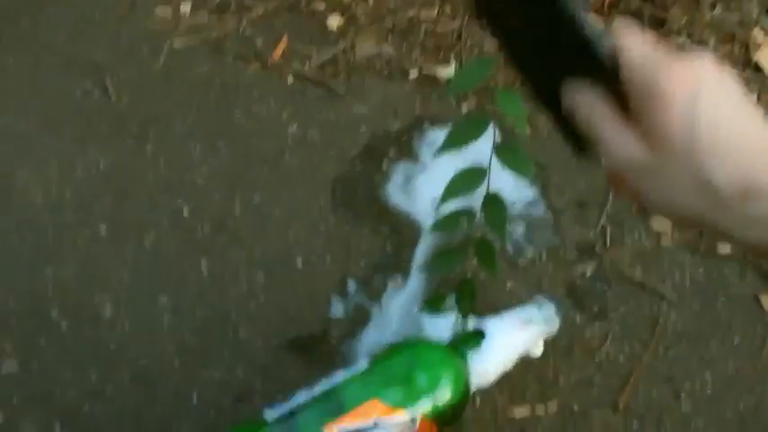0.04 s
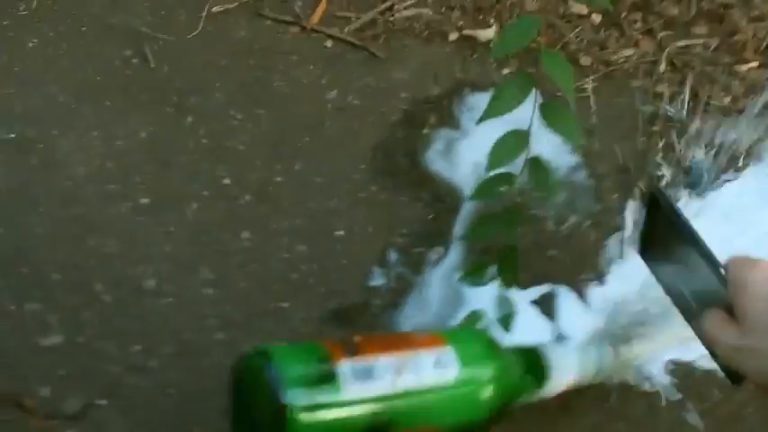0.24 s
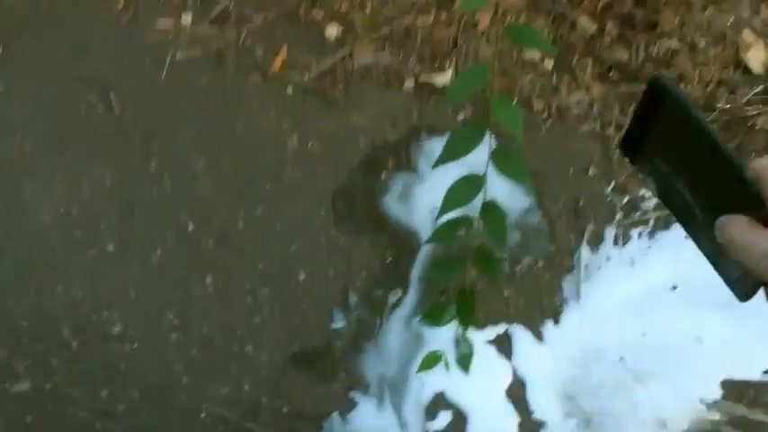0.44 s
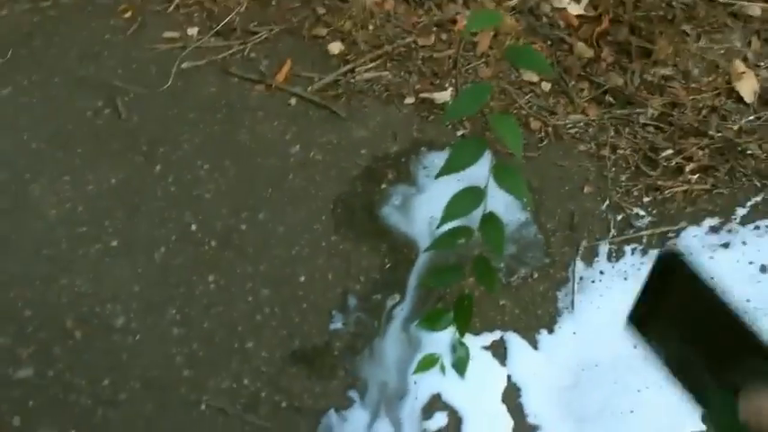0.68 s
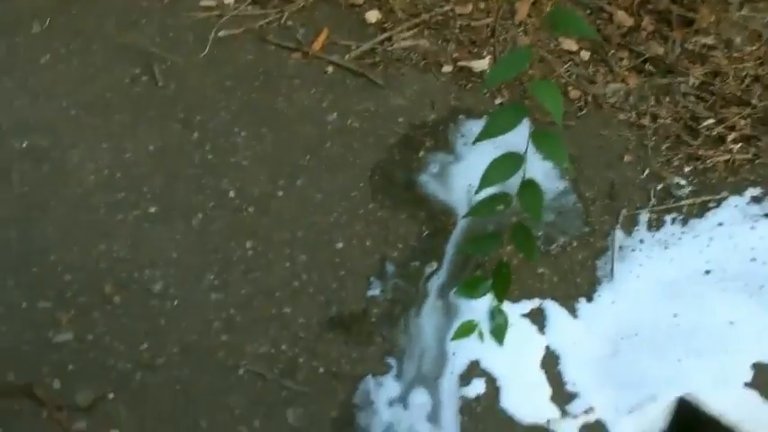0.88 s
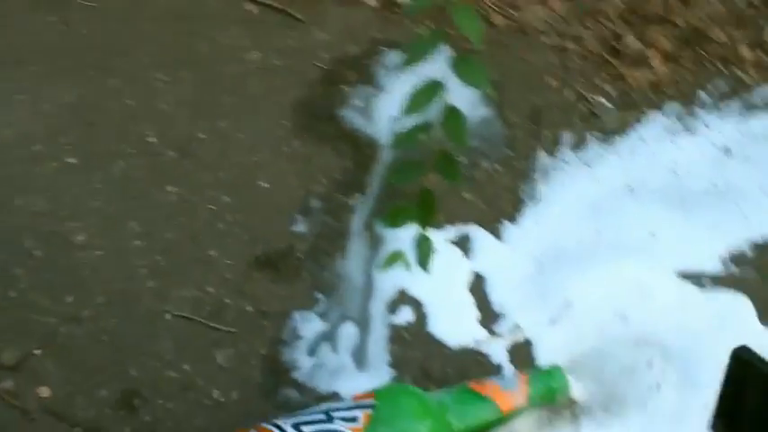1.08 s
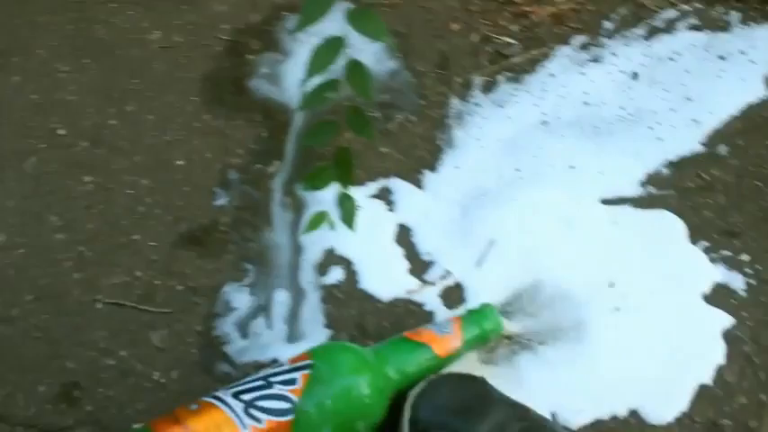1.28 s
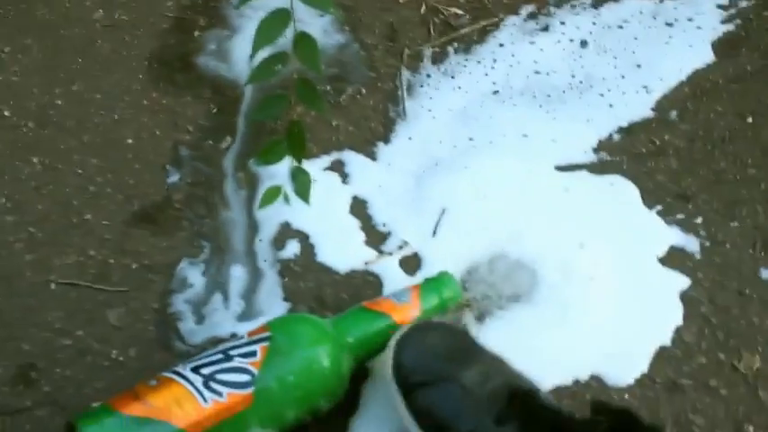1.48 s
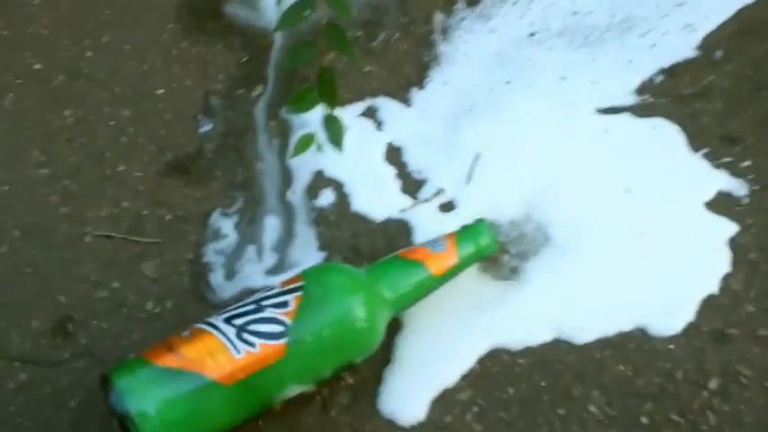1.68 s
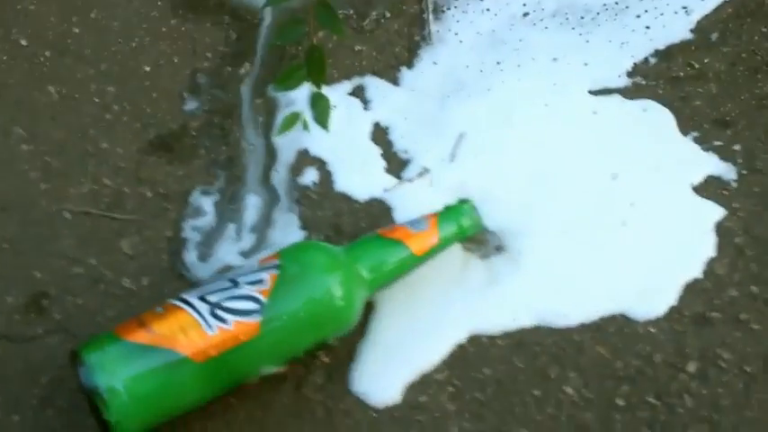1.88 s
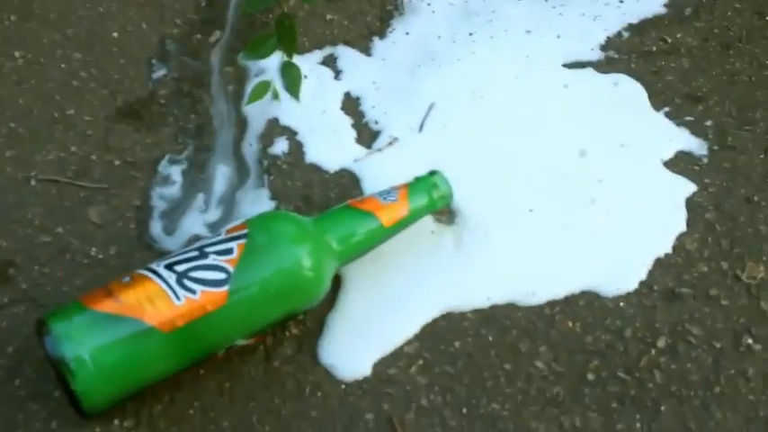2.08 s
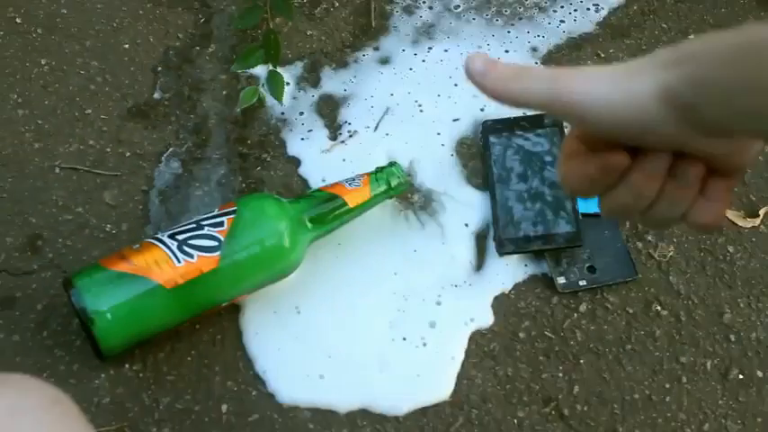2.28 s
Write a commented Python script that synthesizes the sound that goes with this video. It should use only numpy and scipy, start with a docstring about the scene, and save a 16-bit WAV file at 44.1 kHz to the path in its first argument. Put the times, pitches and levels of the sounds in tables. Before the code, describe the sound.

Loud, sharp knocks come from a glass bottle struck and dropped on pavement close by, with a brief spatter of foam. Softer bounces and gritty scrapes follow, over faint outdoor hiss and a faraway engine.

```python
"""A glass bottle of fizzy drink is struck, falls and bounces on asphalt, overloading a close microphone.
Each contact rings its damped modes and cracks the grit. Foam hisses, spatters and gurgles from the neck;
the bottle scrapes as it rolls and a shoe nudges it. Behind it the harmonics of a distant engine
slowly rise in pitch under a faint outdoor hiss."""
import sys
import numpy as np
from scipy import signal
from scipy.fft import rfft, irfft
from scipy.io import wavfile

SR = 44100
rng = np.random.default_rng(int(sys.argv[2]) if len(sys.argv) > 2 else 0)


def pcm_store(signal):
    """Save signal as 16-bit PCM."""
    levels = np.round(np.clip(np.atleast_2d(signal), -1, 1) * 32767)
    wavfile.write(sys.argv[1], SR, levels.astype(np.int16).T)


N = 108045


def undb(db):
    """Decibels to gain."""
    return 10 ** (np.asarray(db) / 20)


def unit(x):
    """Scale to rms 1."""
    return x / np.sqrt(np.mean(x ** 2))


def curve(rows):
    """Straight lines through (time [s], value) points."""
    return np.interp(np.arange(N) / SR, *np.array(rows).T)


def colour(x, spectrum):
    """Filter by (frequency [Hz], gain [dB]) points, to rms 1."""
    hz, db = np.array(spectrum).T
    bins_hz = np.maximum(np.fft.rfftfreq(len(x), 1 / SR), 1)
    gain = undb(np.interp(np.log(bins_hz), np.log(hz), db))
    return unit(irfft(rfft(x) * gain, len(x)))


def low_cut(x, hz):
    """Second-order high-pass."""
    return signal.sosfilt(signal.butter(2, hz, "high", fs=SR, output="sos"), x)


def grit(size, spread_db):
    """Noise in 32-sample grains of uneven strength."""
    return rng.standard_normal(size) * undb(spread_db * rng.standard_normal(size // 32 + 1).repeat(32)[:size])


def flutter(cutoff_hz):
    """Smooth random wobble, rms 1."""
    return unit(signal.sosfilt(signal.butter(2, cutoff_hz, fs=SR, output="sos"), rng.standard_normal(N)))


def add(out, start_s, x):
    """Mix x into out."""
    i = max(int(start_s * SR), 0)
    out[i:i + len(x)] += x[:max(N - i, 0)]


def decay(t, t60_s):
    """Exponential fall, 60 dB per t60_s."""
    return np.exp(-np.log(1000) * t / t60_s)


def ring(modes, t, pitch):
    """Damped modes at pitch times their base frequency; neighbours swing in opposite directions."""
    return sum((-1) ** k * undb(db) * np.sin(2 * np.pi * hz * pitch * t) * decay(t, t60_s)
               for k, (hz, db, t60_s) in enumerate(modes))


def outdoor_air():
    """Steady low air noise and a faint mid hiss that swells."""
    # (frequency [Hz], gain [dB])
    air_spectrum = [(20, -20.5), (40, -11.5), (80, -10.5), (200, -2), (290, -9.5), (420, -19.5), (800, -19),
                    (1600, -18), (3000, -26), (6000, -35.5), (15000, -36)]
    swell_spectrum = [(200, -25), (900, -7), (1400, -7), (1900, 1.5), (2800, -5.5), (4000, -13),
                      (8000, -19.5), (16000, -31.5)]
    # (time [s], level [dB])
    swell_level = [(0, -69), (.8, -64.5), (1.3, -61), (1.8, -58.5), (2.25, -61.5), (2.45, -68.5)]
    air = undb(-52.5) * colour(rng.standard_normal(N), air_spectrum)
    swell = undb(curve(swell_level)) * colour(grit(N, spread_db=2.5), swell_spectrum)
    return air + swell


def engine():
    """Fluttering harmonics of a distant engine; the even ones take over as it speeds up."""
    # (time [s], cycle rate [Hz])
    revs = [(0, 23.3), (.19, 24.5), (.64, 27), (1.19, 30.5), (1.55, 31.5), (1.95, 32.5), (2.26, 33.5),
            (2.45, 30)]
    # (time [s], level [dB])
    level = [(0, -53), (.2, -55), (.7, -51.5), (1.15, -48.5), (1.6, -50), (1.95, -55), (2.27, -53),
             (2.34, -58), (2.45, -57)]
    # (order, gain at low revs [dB], gain at high revs [dB])
    harmonics = [(2, -6, 0), (3, 6, -9), (4, -6, -3), (5, -19, -25.5), (6, -6.5, 0.5), (7, -7.5, -23.5),
                 (8, -13, -14.5), (9, -17, -38), (10, -16, -16.5)]
    low_revs_hz, high_revs_hz, flutter_db = 25.99, 30.33, 0.95
    lag_turns = .13  # each order trails the one below
    hz = curve(revs)
    turns = np.cumsum(hz) / SR
    blend = np.clip((hz - low_revs_hz) / (high_revs_hz - low_revs_hz), 0, 1)
    drone = np.zeros(N)
    for order, low_db, high_db in harmonics:
        gain = undb(low_db + (high_db - low_db) * blend + flutter_db * flutter(cutoff_hz=14))
        drone += gain * np.sin(2 * np.pi * order * (turns - lag_turns))
    return np.sqrt(2) * drone * undb(curve(level))


def scatter(x):
    """The surroundings return a short, weak tail."""
    # (frequency [Hz], gain [dB])
    spectrum = [(100, -7), (400, 0.5), (1200, -9), (3000, -6), (6000, -2), (16000, -2)]
    gain_db, delay_s = -24, .002
    t = np.arange(SR // 4) / SR
    tail = colour(rng.standard_normal(len(t)), spectrum) * decay(t, t60_s=0.18) * (t > delay_s)
    return undb(gain_db) * signal.fftconvolve(x, tail / np.linalg.norm(tail))[:N]


def scrapes():
    """Glass and shoe rub briefly over the grit."""
    # (start [s], length [s], centre [Hz], relative width, level [dB])
    rubs = [(0.275, 0.018, 1650, .9, -34), (0.559, 0.11, 370, .5, -56.5), (1.044, .016, 1302, 0.54, -60),
            (1.0737, 0.016, 1070, 0.35, -49.5), (1.088, 0.095, 1020, 0.28, -55),
            (1.597, 0.033, 865, 1, -46), (1.598, 0.028, 5000, .6, -59), (1.742, 0.029, 1000, 0.55, -41.5),
            (1.7521, 0.0062, 4200, 0.81, -41), (1.758, 0.02, 4000, 0.66, -57.5),
            (1.763, 0.021, 400, 0.42, -43.5)]
    out = np.zeros(N)
    for start_s, length_s, hz, width, db in rubs:
        size = int(length_s * SR)
        edges_hz = [hz / (1 + width), min(hz * (1 + width), .45 * SR)]
        band = signal.butter(2, edges_hz, "band", fs=SR, output="sos")
        rub = signal.sosfilt(band, grit(size, spread_db=3))
        envelope = np.sqrt(np.sin(np.pi * np.arange(size) / size))
        add(out, start_s, undb(db) * unit(rub * envelope))
    return out


def gurgles():
    """Gas pockets in the neck ring with a gliding pitch."""
    # (start [s], length [s], first pitch [Hz], middle pitch [Hz], last pitch [Hz], gain [dB])
    pockets = [(0.285, .034, 1267, 955, 1485, -29), (0.473, 0.0276, 880, 1325, 1660, -37.5)]
    out = np.zeros(N)
    for start_s, length_s, *glide_hz, db in pockets:
        progress = np.linspace(0, 1, int(length_s * SR))
        hz = np.polyval(np.polyfit([0, .5, 1], glide_hz, 2), progress)
        envelope = 2 * np.sin(np.pi * progress) * np.exp(-1.5 * progress)
        add(out, start_s, undb(db) * envelope * np.sin(2 * np.pi * np.cumsum(hz) / SR))
    return out


def foam_jet():
    """Foam hisses out with the first blow, droplets spatter; both fade as the pressure drops."""
    # (time [s], level [dB])
    level = [(.234, -64), (.24, -23), (.27, -41), (.33, -44.5), (.40, -47.5), (.50, -55.5), (.62, -60),
             (.8, -73), (1.0, -92.5)]
    # (frequency [Hz], gain [dB])
    hiss_spectrum = [(200, -9), (600, -0.5), (1300, -0.5), (2500, 0.5), (4500, 0.5), (7000, -3),
                     (10000, -4), (16000, -8.5)]
    spatter_spectrum = [(300, -19), (1500, -4), (4000, 0), (8000, -4.5), (16000, -9.5)]
    drops_per_s, drop_spread_db, spatter_db = 670, 5, -5
    hiss = colour(grit(N, spread_db=3), hiss_spectrum)
    arrivals = rng.random(N) < drops_per_s / SR
    drops = arrivals * undb(drop_spread_db * np.clip(rng.standard_normal(N), -2, 2))
    splash = rng.standard_normal(64) * np.exp(-np.arange(64) / 12)
    spatter = colour(signal.fftconvolve(drops, splash)[:N], spatter_spectrum)
    return (hiss + undb(spatter_db) * spatter) * undb(curve(level))


def bottle_knocks():
    """Each contact rings the full, heavily damped bottle and cracks the grit beneath it."""
    # (time [s], knock and clink pitch ratio, thud [dB], knock [dB], clink [dB], chink [dB], crack [dB])
    contacts = [(0.2348, 1.276, -30, -1.5, 0.5, -5.5, 5), (0.2362, 0.88, 5, -0.5, -9, -25, -3.5),
                (0.2482, 1.25, -30, -16, -26, -8.5, -9), (0.2546, 1, -17, -6, 0.5, -9.5, -30),
                (0.306, 1.04, -18.5, -10, -11, -37, -23), (.4020, 1.9, -57, -36.5, -48, -55, -48),
                (0.4256, 0.72, -52, -37.5, -36, -34, -35), (0.4289, .97, -3.5, 5.5, -31, -15.5, -18.5),
                (0.4461, 1.025, -5.5, 4.5, -0.5, -33, -16), (0.4617, 1.28, -17, -15.5, -28, -38, -18),
                (0.4812, 0.84, -28, -16.5, -31, -55, -52), (.4930, 0.87, -25, -24, -50, -62, -60),
                (0.511, 1.1, -31, -41, -58, -64, -62), (0.5418, 0.91, -26, -29.5, -48, -55, -57),
                (.5470, .9, -29.5, -32, -46, -45, -50), (.6345, 1.07, -44, -36.5, -58, -57, -59),
                (0.6883, 1.08, -18.5, -35.5, -35, -39.5, -35.5),
                (0.6969, 1.14, -26, -31, -51.5, -54, -63.5), (.7040, 0.84, -32, -26.5, -44, -61, -62),
                (0.709, 0.74, -31, -32, -46, -62, -63), (0.7447, 1, -34, -25, -50, -32.5, -41),
                (0.76, 0.85, -30, -37, -51, -63, -62), (1.602, 0.75, -44, -32.5, -45, -45, -53),
                (1.6063, 1.02, -21.5, -31, -51, -48, -48), (1.6109, 0.99, -30, -23.5, -44, -37, -40),
                (1.7352, 1.28, -33, -25.5, -36, -40, -60), (1.7393, 1.29, -39, -24.5, -29, -65, -36.5),
                (1.7444, 1.5, -33, -46, -42, -53, -59), (1.7545, 0.48, -47, -30, -52, -42, -34),
                (1.8479, 0.95, -47, -26.5, -40.5, -48.5, -54)]
    # bottle modes, low to high (base frequency [Hz], gain [dB], t60 [s])
    thud_modes = [(324.1, -2, .009), (540, 1.5, 0.0056)]
    knock_modes = [(1108, 3, 0.0057), (1440, 6, 0.0049), (1850, -6.5, 0.01)]
    clink_modes = [(2640, 1, 0.0078), (3180, -5, .012), (3480, -3.5, .008), (3850, -8.5, .009)]
    chink_modes = [(4980, -4, 0.014), (6070, -4.5, 0.0082), (6863, -3.5, .007), (8000, -6, .005)]
    # (frequency [Hz], gain [dB])
    crack_spectrum = [(300, -12), (1500, -2), (4000, 1.5), (7000, -4), (9500, -8.5), (12000, -7.5),
                      (16000, -13.5)]
    contact_s = .00015
    out, t = np.zeros(N), np.arange(2048) / SR
    attack = 1 - np.exp(-t / contact_s)
    thud = ring(thud_modes, t, pitch=0.86)
    chink = ring(chink_modes, t, pitch=0.96)
    for start_s, pitch, thud_db, knock_db, clink_db, chink_db, crack_db in contacts:
        crack = colour(rng.standard_normal(len(t)), crack_spectrum) * decay(t, t60_s=0.0079)
        body = undb(thud_db) * thud - undb(knock_db) * ring(knock_modes, t, pitch)
        glass = undb(clink_db) * ring(clink_modes, t, pitch) + undb(chink_db) * chink
        add(out, start_s, (body + glass + undb(crack_db) * crack) * attack)
    return low_cut(out, hz=110)


def scene():
    """All sources at one microphone."""
    bottle = bottle_knocks() + gurgles() + scrapes()
    return (bottle + scatter(bottle) + foam_jet() + engine() + outdoor_air())[None]


def record(dry):
    """Bass cut, clipping on the hardest knocks, steep top cut."""
    drive_db, top_hz = -1, 16100
    clipped = np.clip(undb(drive_db) * low_cut(dry, hz=32), -1, 1)
    return signal.sosfilt(signal.ellip(10, .2, 90, top_hz, fs=SR, output="sos"), clipped)


dry = scene()
out = record(dry)
pcm_store(out)
```